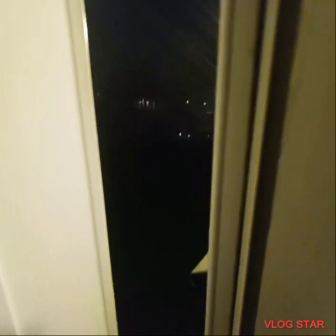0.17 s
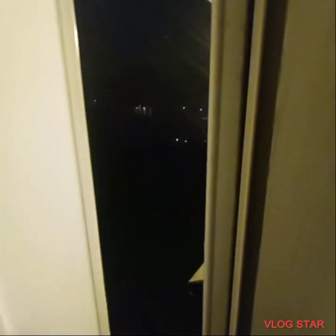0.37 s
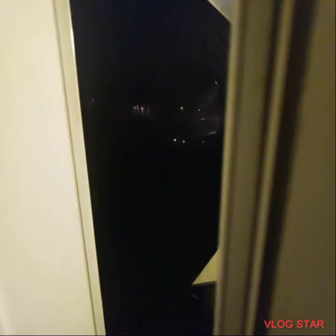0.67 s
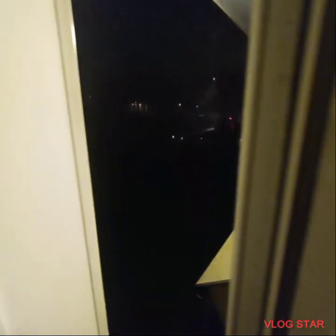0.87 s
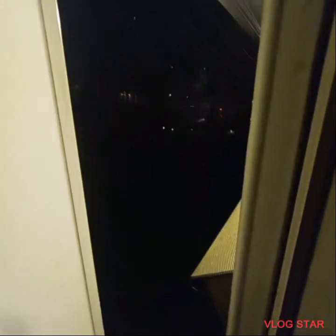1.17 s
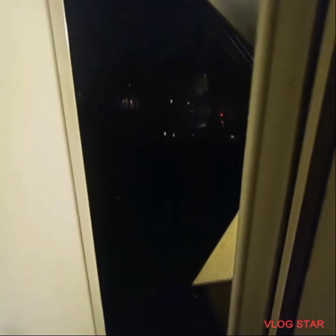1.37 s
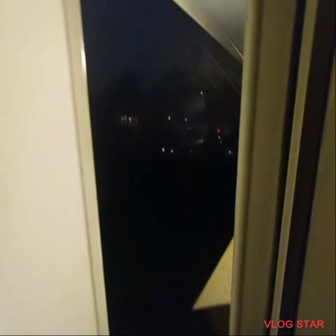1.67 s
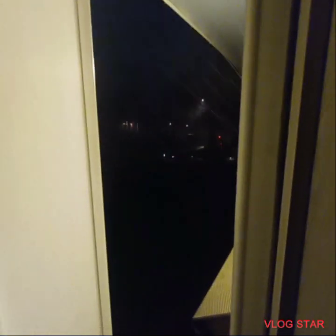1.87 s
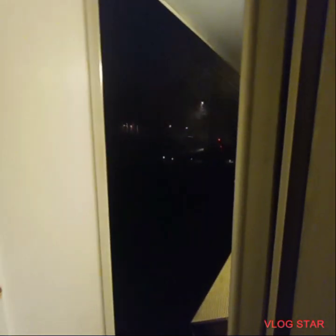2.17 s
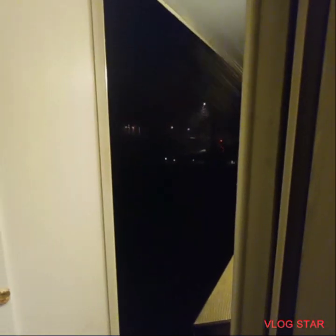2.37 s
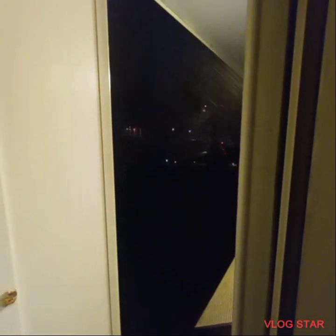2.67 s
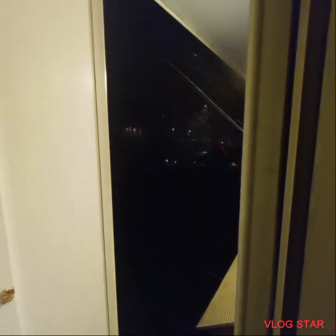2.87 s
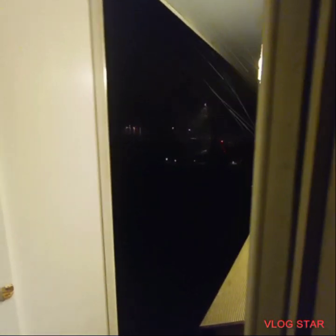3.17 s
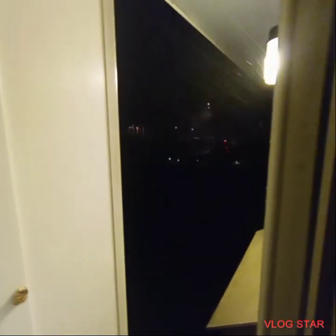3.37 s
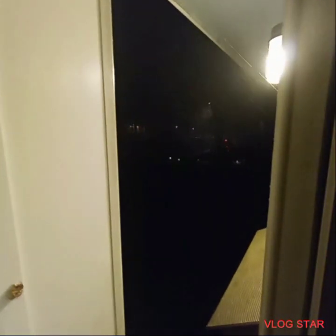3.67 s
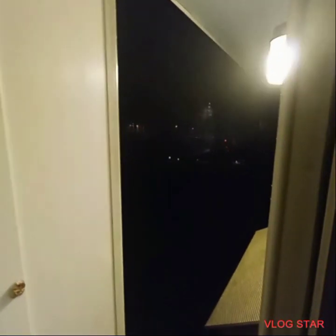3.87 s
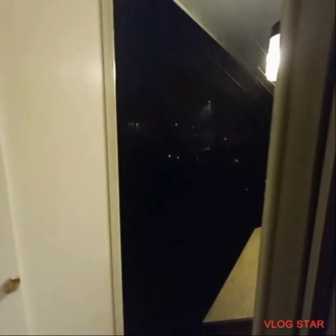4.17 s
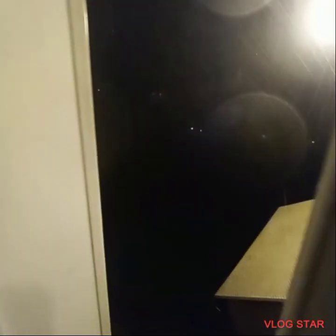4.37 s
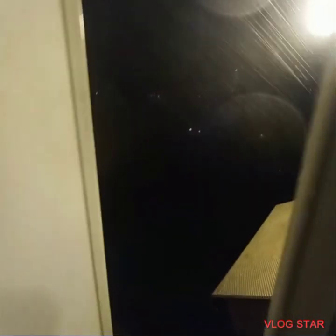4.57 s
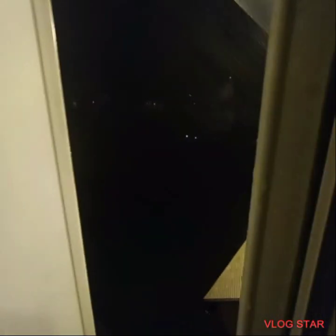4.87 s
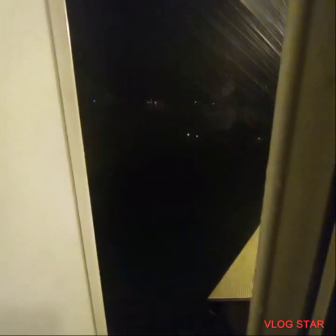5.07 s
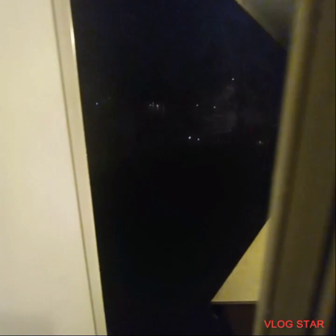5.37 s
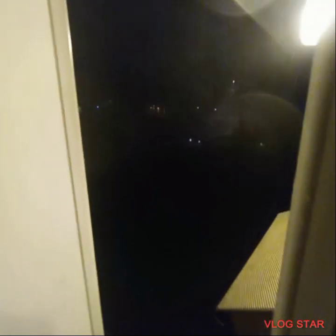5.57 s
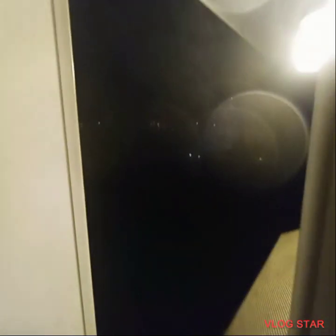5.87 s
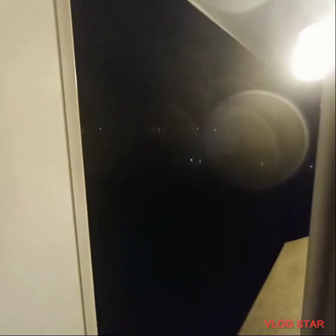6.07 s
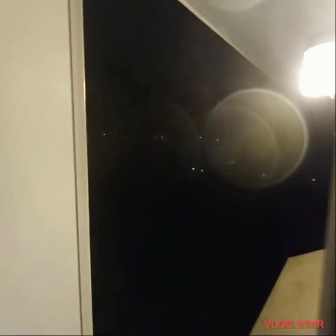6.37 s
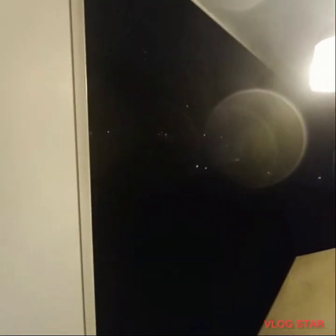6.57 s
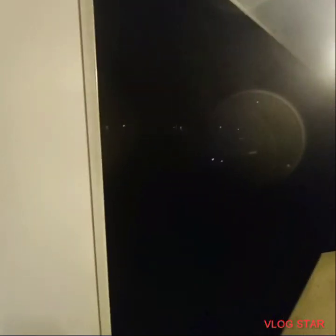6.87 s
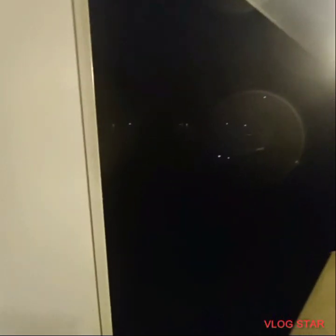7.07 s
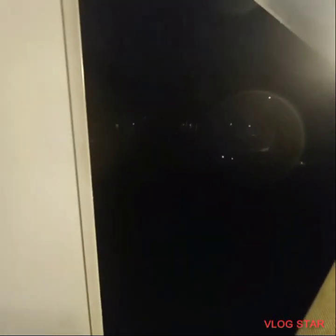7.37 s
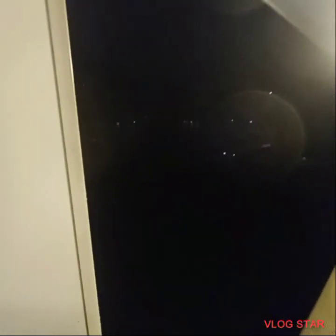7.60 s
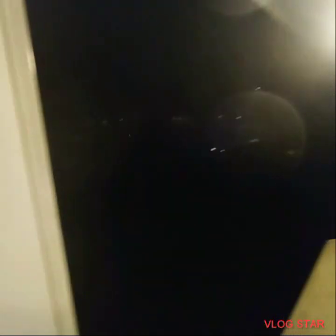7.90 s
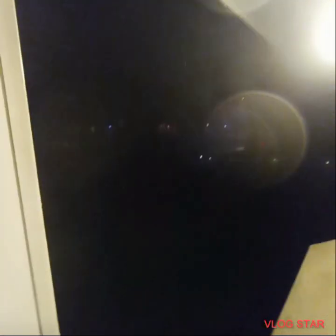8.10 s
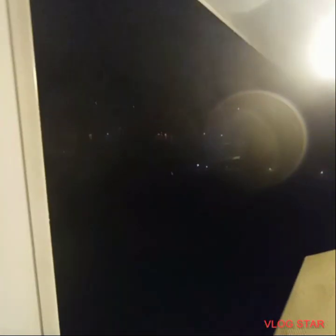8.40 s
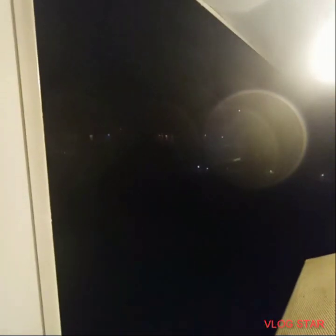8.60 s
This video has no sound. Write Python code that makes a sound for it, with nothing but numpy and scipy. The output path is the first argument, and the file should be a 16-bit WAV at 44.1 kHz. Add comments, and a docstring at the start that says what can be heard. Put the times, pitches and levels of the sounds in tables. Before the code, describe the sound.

Wide stereo rainfall at an open window: distant wash, nearer splashes and thin spray above a low, uneven rumble with room boom. Halfway through, the sound abruptly drops out and quickly fades in again. Now the microphone seems nearer the opening; spray is much brighter and fizzier, water slaps down outside, and single drops snap and patter until the end.

```python
"""Heavy rain heard from a room through an open window: far rain as a wash, nearer rain as splashes, fine
spray as a bright fizz, all made of random noise bursts. Single drops tick on the sill and water splats
outside, each a short burst round its own pitch. Behind lies the storm: low rumble, a room boom, a roar
and a faint wavering hum. The sound drops out half way and fades back in with the rain heard closer to
the opening, where the spray is brighter."""
import sys
import numpy as np
from scipy import signal
from scipy.fft import rfft, irfft, next_fast_len
from scipy.io import wavfile
from scipy.ndimage import uniform_filter1d, map_coordinates

SR = 44100
rng = np.random.default_rng(int(sys.argv[2]) if len(sys.argv) > 2 else 0)


def output_pcm(signal):
    """Save a mono or channel-first signal as 16-bit PCM at the path in sys.argv[1].

    Samples are clipped to [-1, 1] before scaling.
    """
    pcm = np.clip(np.atleast_2d(signal).T, -1, 1) * 32767
    wavfile.write(sys.argv[1], SR, np.round(pcm).astype(np.int16))


N = 385434

MOVE_S = 4.5  # from here on the rain is heard nearer the opening
SPRAY_DB = (-54, -45)  # mean spray level: back in the room, near the opening


def amp(db):
    """Decibels to gain."""
    return 10 ** (np.asarray(db) / 20)


def unit(x):
    """Scale to rms 1."""
    return x / np.sqrt(np.mean(x ** 2) + 1e-20)


def along(points, hz):
    """Read (Hz, value) points on a logarithmic frequency axis."""
    f, v = np.transpose(points)
    return np.interp(np.log(hz + 1), np.log(f + 1), v)


def curves(rows):
    """One value per sample for each column after the time."""
    s, *cols = np.transpose(rows)
    return [np.interp(np.arange(N) / SR, s, c) for c in cols]


def wobble(rate):
    """A smooth random curve with rate knots a second."""
    coarse = np.arange(0, N + 64, 64)
    knots = rng.standard_normal(int(N * rate / SR) + 4)
    smooth = map_coordinates(knots, [coarse * rate / SR])
    return np.interp(np.arange(N), coarse, smooth)


def filtered(x, response):
    """Multiply the spectrum of x by a response of frequency."""
    n = x.shape[-1]
    m = next_fast_len(n + SR // 8)
    hz = np.fft.rfftfreq(m, 1 / SR)
    return irfft(rfft(x, m) * response(hz), m)[..., :n]


def add(out, s, sound):
    """Mix a short stereo sound in at time s."""
    part = out[:, round(s * SR):][:, :sound.shape[1]]
    part += sound[:, :part.shape[1]]


def near(back, close):
    """One value back in the room, the other once the listener stands near the opening."""
    return np.where(np.arange(N) / SR < MOVE_S, back, close)


def noise():
    """Two unrelated white noises."""
    return rng.standard_normal((2, N))


def spread(pair, spectrum):
    """Turn two unrelated signals into a coloured diffuse field of rms 1: bass alike in both ears, treble not."""
    # how alike left and right are: (frequency [Hz], correlation [-1 to 1])
    alike = [(25, 0.74), (70, 0.99), (150, 0.97), (250, 0.89), (330, 0.89), (400, .45), (480, -0.078),
             (650, 0.2), (850, -0.27), (1500, 0.015), (4000, -0.036)]

    def mid_side_gains(hz):
        turn = np.arccos(np.clip(along(alike, hz), -1, 1)) / 2
        return amp(along(spectrum, hz)) * np.array([np.cos(turn), np.sin(turn)])

    mid, side = filtered(pair, mid_side_gains)
    return unit(np.array([mid + side, mid - side]))


def patter(rate, size_db, t60, far_db):
    """Random impacts (rate a second) of uneven size, each a short burst, over the blur of countless far ones."""
    sizes = amp(size_db * np.minimum(rng.standard_normal(N), 2.5))
    hits = (rng.random(N) < rate / SR) * sizes
    # each hit's power falls 60 dB in t60 seconds
    power = signal.lfilter([1], [1, -amp(-120 / (t60 * SR))], hits ** 2)
    return noise() * np.sqrt(power / power.mean() + amp(far_db) ** 2)


def walls(x, wall_db=-17, count=8):
    """Each port hears its own few weak reflections from the frame and walls, which ripple the spectrum."""
    out = x.copy()
    for port in (0, 1):
        lags_s = rng.uniform(.002, .022, count)
        signs = rng.choice([-1, 1], count)
        for lag, sign in zip(lags_s, signs):
            out[port] += sign * amp(wall_db) * np.roll(x[port], round(lag * SR))
    return unit(out)


def storm(hum_hz=153):
    """Wind and rain rumble on the building; the room booms at one low resonance, and a wavering hum joins in."""
    # strength of the low rumble: (time [s], level [dB])
    strength = [(0, -42), (0.35, -47), (1.7, -41.5), (2.1, -47.5), (2.75, -42.5), (4.2, -44.0), (4.95, -44),
                (5.7, -44), (6.8, -40), (8.1, -40.5), (8.7, -42)]
    # hum that swells for a while: (time [s], level [dB])
    hum_level = [(0, -65), (3.3, -47), (3.55, -42.5), (4.24, -42), (4.9, -55), (8.7, -49)]
    # colours of rumble, room boom and roar: (frequency [Hz], relative level per Hz [dB])
    rumble_colour = [(15, -24.5), (32, -28.5), (50, -13.5), (70, -6.5), (90, 0), (112, 0.5), (130, 2),
                     (150, -9.5), (185, -13.5), (400, -59)]
    boom_colour = [(90, -41), (125, -9.5), (140, -2.5), (156, 0.5), (172, -5), (195, -14.5), (300, -44.5)]
    roar_colour = [(110, -43), (170, -4), (200, -2.5), (235, -1.5), (275, -1), (335, -2.5), (385, -9),
                   (460, -15), (650, -24), (1500, -74.5)]

    strength_db, = curves(np.vstack(strength))
    swell_db = strength_db - strength_db.mean()

    rumble_db = strength_db - 1 + .5 * wobble(6)
    rumble = amp(rumble_db) * spread(noise(), rumble_colour)

    # boom and roar follow only a share of the swell
    boom_db = -42.5 + .55 * swell_db + 0.54 * wobble(4)
    boom = amp(boom_db) * spread(noise(), boom_colour)

    roar_db = -38 + 0.11 * swell_db + 0.7 * wobble(8.3)
    impacts = patter(rate=380, size_db=1, t60=0.015, far_db=7.0)
    roar = amp(roar_db) * spread(impacts, roar_colour)

    phase = 2 * np.pi * np.cumsum(hum_hz + 1.2 * wobble(9)) / SR
    hum_db = curves(hum_level)[0] + 1.5 * wobble(6.3)
    hum = amp(hum_db) * unit(np.sin(phase))
    return rumble + boom + roar + hum


def drop(db, hz, octaves, t60, rise=0.00047, spatter_db=1.0, length=6000):
    """One drop, length samples long: a burst round its own pitch that breaks into smaller droplets as it dies."""
    t = np.arange(length) / SR
    bins_hz = np.fft.rfftfreq(length, 1 / SR)
    band = np.exp(-.5 * (np.log2((bins_hz + 1) / hz) / octaves) ** 2)
    burst = unit(irfft(rfft(rng.standard_normal((2, length))) * band, length))
    # the droplets' uneven level sets in over the first 4.9 ms
    droplets = unit(uniform_filter1d(rng.standard_normal(length), size=90)) * np.minimum(t / 0.0049, 1)
    decay_db = db - 60 * t / t60 + spatter_db * droplets
    return burst * amp(decay_db) * (1 - np.exp(-t / rise))


def splats():
    """Water slaps down outside: bursts round lower pitches, some of them broad and long."""
    # (time [s], level [dB], pitch [Hz], width [octaves], time to fall 60 dB [s])
    slaps = [(0.952, -35, 1895, .31, 0.029), (4.924, -43, 3000, 1.1, .23), (4.96, -35, 1250, 1.8, 0.31),
             (5.336, -36, 1300, 1.4, 0.2), (6.987, -34, 1500, 0.22, 0.067), (6.995, -36, 3400, 1.2, .11),
             (7.027, -33.5, 1220, 0.48, 0.049)]
    out = np.zeros((2, N))
    for s, db, hz, octaves, t60 in slaps:
        add(out, s, drop(db, hz, octaves, t60))
    return out


def drops(count=260, over_spray_db=.5, size_db=2.5, pitch_hz=7400, pitch_octaves=0.44, width_octaves=.33):
    """Loud drops snap and scatter on the sill, among many small ones near the level of the spray."""
    # loud drops: (time [s], level [dB], pitch [Hz], time to fall 60 dB [s])
    loud_drops = [(5.292, -39, 9000, .035), (5.996, -36, 8950, 0.063), (6.059, -34, 12000, .03),
                  (6.079, -40, 6000, .06), (6.274, -38, 5500, 0.055), (6.328, -38, 5900, 0.11),
                  (6.395, -38, 5200, .068), (6.413, -38, 5960, 0.042), (6.438, -32, 5630, 0.02),
                  (6.658, -41, 6600, 0.2), (6.806, -37.5, 5130, 0.066), (7.105, -32.5, 7700, 0.021),
                  (7.143, -20, 6400, 0.0083), (7.231, -37, 5600, .05), (7.463, -40, 6000, .045),
                  (7.553, -35, 10500, .03), (7.742, -40, 6000, .054), (7.839, -32, 6200, .011),
                  (7.841, -23.5, 15500, 0.01), (8.014, -40, 6700, 0.05), (8.347, -42, 11000, .03)]
    out = np.zeros((2, N))
    for s, db, hz, t60 in loud_drops:
        body = drop(db, hz, width_octaves, t60)
        snap = drop(db - 12, hz=11000, octaves=.8, t60=.008)
        scatter = drop(db - 17.5, hz=5800, octaves=0.65, t60=0.11)  # droplets thrown up
        add(out, s, body + snap + scatter)

    spray_db = near(*SPRAY_DB)
    starts = rng.integers(0, N, count)
    variations = np.clip(rng.standard_normal((count, 2)), -2, 2)
    for start, (size, pitch) in zip(starts, variations):
        db = spray_db[start] + over_spray_db + size_db * size
        hz = pitch_hz * 2 ** (pitch_octaves * pitch)
        add(out, start / SR, drop(db, hz, width_octaves, t60=0.05, length=2400))
    return out


def rain(wash_follows=.75, splash_follows=0.59, spray_follows=1.05, fizz_follows=1.5):
    """Far rain washes, nearer rain splashes, and fine spray fizzes at the opening; all follow the rainfall."""
    # strength of the rainfall, one list for each side of the dropout: (time [s], level [dB])
    rainfall = [
        [(0, -43.5), (0.8, -47), (1.7, -46.5), (2.4, -45), (3.0, -42.5), (3.5, -44.0), (4.2, -44.5)],
        [(4.95, -42), (5.7, -42.5), (6.4, -43), (7.6, -43.5), (8.7, -44)],
    ]
    # colours of the layers: (frequency [Hz], relative level per Hz [dB])
    wash_colour = [(250, -44.5), (420, -5.5), (520, -1), (620, -2), (760, 0), (880, -5), (1000, -5.5),
                   (1220, -11.5), (1500, -15.5), (1820, -13.5), (2500, -18), (8000, -59)]
    near_wash_colour = [(250, -40), (400, -2), (470, 2.5), (560, -0.5), (730, -1), (850, -3.5), (1000, -6),
                        (1250, -9), (1600, -12.5), (2500, -21), (8000, -59)]
    splash_colour = [(500, -26.5), (1000, -6), (1300, -3.5), (1750, 0), (2050, -1.5), (2500, -4),
                     (3400, -5.5), (4500, -7), (6500, -7), (8000, -14), (11000, -23), (16000, -39.5)]
    spray_colour = [(700, -46.5), (1400, -3), (2500, -0.5), (4000, -1), (5500, 0), (7500, 1), (10500, 0),
                    (13000, -5), (16000, -8.5)]
    fizz_colour = [(6000, -40), (11000, -13.5), (13500, -0.5), (16000, -3)]

    swells_db = [curves(rows)[0] - np.mean(rows, axis=0)[1] for rows in rainfall]
    swell_db = near(*swells_db)
    # a sheet of rain splashes down: extra level near the opening, ebbing from 5.15 s
    since = np.arange(N) / SR - 5.15
    surge_db = near(0, 4.5 * np.exp(-np.maximum(since, 0) / 0.43))
    gust = wobble(8)

    # the far rain changes colour once the listener stands nearer the opening
    far = patter(rate=500, size_db=2.0, t60=0.024, far_db=3.5)
    far = near(spread(far, wash_colour), spread(far, near_wash_colour))
    wash_db = near(-45.5, -47.5) + wash_follows * swell_db + 0.24 * surge_db + 0.72 * gust
    wash = amp(wash_db) * walls(far, wall_db=-20)

    splashes = spread(patter(rate=590, size_db=6.0, t60=0.014, far_db=8.5), splash_colour)
    splash_db = near(-46, -47.5) + splash_follows * swell_db + surge_db + 0.28 * gust
    splash = amp(splash_db) * walls(splashes, wall_db=-20.0)

    flurry = wobble(19)
    spray_db = near(*SPRAY_DB) + spray_follows * swell_db + .35 * flurry
    spray = amp(spray_db) * spread(patter(rate=800, size_db=5.0, t60=0.005, far_db=7.5), spray_colour)

    # the finest droplets carry only a short way, so they grow more than the spray near the opening
    fizz_db = near(-63.5, -48) + fizz_follows * swell_db + .8 * flurry
    fizz = amp(fizz_db) * spread(patter(rate=720, size_db=2.5, t60=.005, far_db=3.5), fizz_colour)
    return wash + splash + spray + fizz


def scene():
    """Everything that comes in through the window."""
    return storm() + splats() + drops() + rain()


def dropout(cut_s=4.252, cut_length_s=.008, resume_s=4.703, resume_gain=0.062):
    """Gain that cuts to silence, waits, and fades back in from a small gain."""
    t = np.arange(N) / SR
    cut = np.clip(1 - (t - cut_s) / cut_length_s, 0, 1)
    rising = np.clip(resume_gain + (t - resume_s) / 0.25, 0, 1)  # gain grows by 1 per 0.25 s
    return cut + (t > resume_s) * rising


def record(dry, top_hz=15850):
    """Each port colours the sound its own way; it drops out once; a steep band limit removes the top."""
    # colour of the two microphone ports: (frequency [Hz], gain [dB])
    left_port = [(170, 1), (310, 3.5), (600, 1), (1800, 4), (3700, 4), (5600, 5.5), (6650, 12.5),
                 (7300, 11.5), (8000, -1), (10100, -6.5), (11200, -16.5), (14000, -4.5), (14800, 6),
                 (15700, 6.5)]
    right_port = [(170, 1.5), (330, 0), (600, 3.5), (1700, 1), (2500, 0), (3900, 3), (5300, -0.5),
                  (6400, -1.5), (8000, -6), (9300, 1), (10700, 5.5), (12500, -1.5), (13900, -4.5),
                  (14800, 6.5)]
    coloured = filtered(dry, lambda hz: amp([along(left_port, hz), along(right_port, hz)]))
    return filtered(coloured * dropout(), lambda hz: 1 / np.sqrt(1 + (hz / top_hz) ** 400))


dry = scene()
out = record(dry)
output_pcm(out)
```